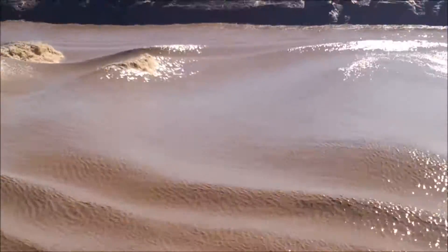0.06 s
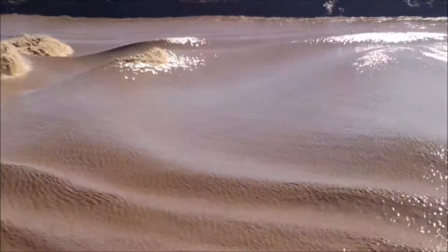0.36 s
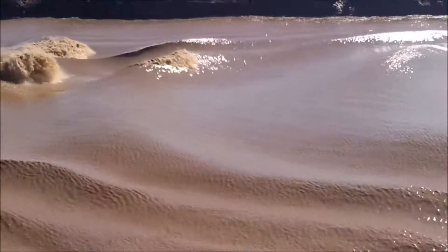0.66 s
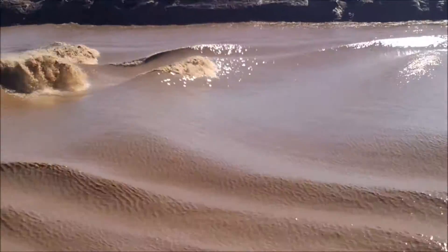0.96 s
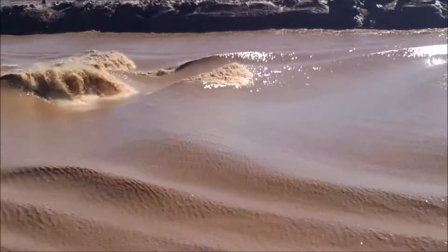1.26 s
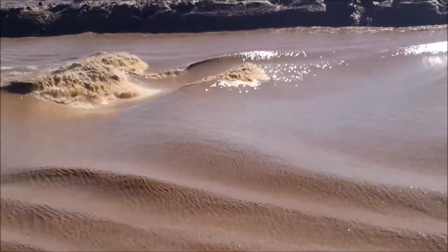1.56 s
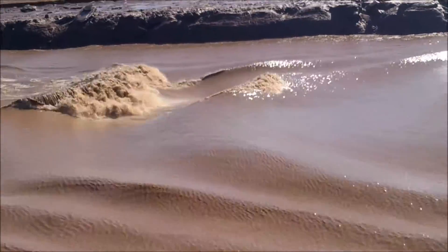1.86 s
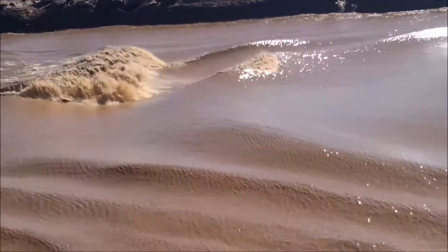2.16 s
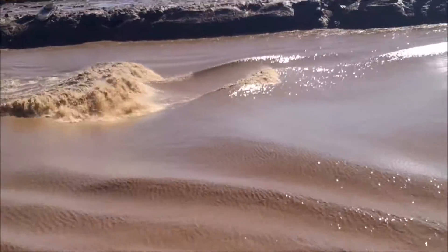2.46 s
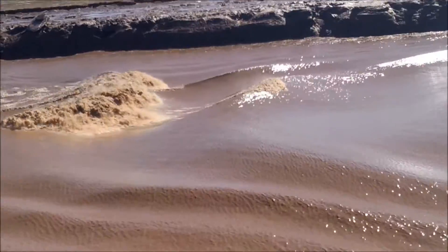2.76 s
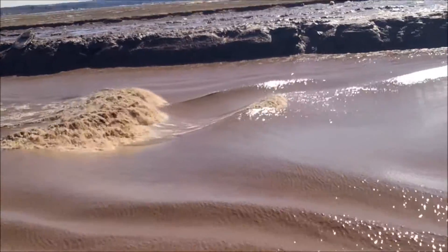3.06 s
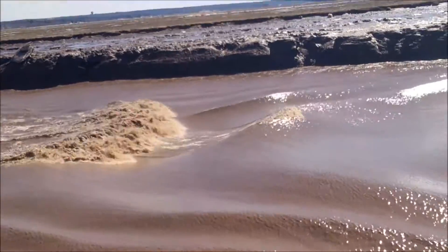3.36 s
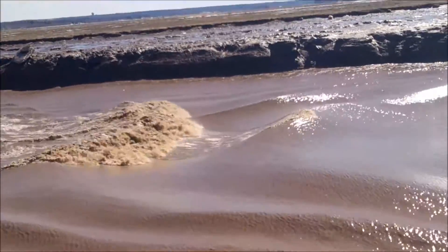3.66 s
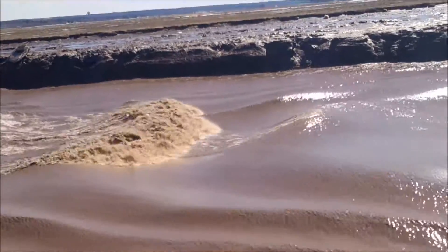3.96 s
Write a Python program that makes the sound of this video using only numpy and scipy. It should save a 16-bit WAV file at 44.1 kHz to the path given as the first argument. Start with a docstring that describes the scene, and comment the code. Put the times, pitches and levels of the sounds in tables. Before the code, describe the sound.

Rushing river water fades in over the first 0.7 seconds as a wave breaks some way off. Its bubbling roar swells until about 2 seconds, then holds to the end at 4 seconds. From about 1 second, spray and foam hiss above it. Close wind rumbles on the microphone throughout, with short fluttering gusts, strongest around 1.1, 2 to 2.4 and 3.2 seconds.

```python
"""A tidal bore runs up a muddy river, its breaking front some way off; the sound fades in.
The tumbling wave traps air, and clouds of bubbles roar as each rings at its own resonance.
Above the roar, spray, a small whitecap and bursting foam hiss with countless tiny impacts.
Close by, the turbulent pressure of the wind rumbles and flutters on the microphone."""
import sys
import numpy as np
from scipy import signal
from scipy.fft import rfft, irfft
from scipy.io import wavfile
from scipy.ndimage import uniform_filter1d

SR = 44100
rng = np.random.default_rng(int(sys.argv[2]) if len(sys.argv) > 2 else 0)


def dump(signal):
    """Clip the signal to [-1, 1] and save it as 16-bit WAV at the path in sys.argv[1]."""
    limited = np.clip(np.atleast_2d(signal).T, -1, 1)
    pcm = np.round(limited * 32767).astype(np.int16)
    wavfile.write(sys.argv[1], SR, pcm)


N = 176400
TIME_S = np.arange(N) / SR
BIN_HZ = np.maximum(np.arange(N // 2 + 1) * SR / N, 1)


def undb(db):
    """Amplitude grows tenfold for every 20 dB."""
    return 10 ** (np.asarray(db) / 20)


def unit(x):
    """Normalisation to rms 1."""
    return x / np.sqrt(np.mean(x ** 2))


def curve(rows, column=1):
    """Linear interpolation of one column of a table over time."""
    rows = np.array(rows)
    return np.interp(TIME_S, rows[:, 0], rows[:, column])


def colour(x, spectrum):
    """Spectral shaping at rms 1, falling 6 dB an octave beyond the table's ends."""
    hz, db = np.array(spectrum).T
    gain = undb(np.interp(np.log(BIN_HZ), np.log(hz), db))
    skirts = np.minimum(BIN_HZ / hz[0], 1) * np.minimum(hz[-1] / BIN_HZ, 1)
    return unit(irfft(rfft(x) * gain * skirts, N))


def resonance(x, hz, width_hz):
    """A damped resonator passes a band, with gain 1 at its centre."""
    return signal.lfilter(*signal.iirpeak(hz, hz / width_hz, fs=SR), x)


def noise():
    """Independent samples give a white spectrum."""
    return rng.standard_normal(N)


def wander(per_s):
    """Smooth random modulation at rms 1."""
    steps = rng.standard_normal(N // 10)
    line = np.interp(TIME_S * per_s, np.arange(len(steps)), steps)
    return unit(uniform_filter1d(line, int(SR / per_s / 2)))


def blend(grains, power_share):
    """Incoherent sources add in power: single grains over a wash of countless smaller ones."""
    return np.sqrt(power_share) * unit(grains) + np.sqrt(1 - power_share) * noise()


def bubbles(per_s=2600, low_hz=280, high_hz=3500, cycles=13, pitch_rise=0.14, spread_db=2):
    """Each bubble is a damped oscillator that rises in pitch as it dies."""
    out = np.zeros(N + SR)
    for when, pitch, size, sign in rng.random((int(per_s * N / SR), 4)):
        hz = low_hz * (high_hz / low_hz) ** pitch
        age = np.linspace(0, 1, int(cycles * SR / hz))
        phase = 2 * np.pi * cycles * age * (1 + pitch_rise * age / 2)
        ring = np.sin(phase) * np.exp(-np.log(100) * age)  # decays by 40 dB
        strength = hz * undb(-spread_db * np.log(max(size, .02)))
        start = int(when * N)
        out[start:start + len(age)] += ring * strength * np.sign(sign - .5)
    return out[:N]


# Spectrum of the bubble cloud: frequency_hz, relative_db
ROAR_SPECTRUM = [(120, -2), (250, -1.5), (350, -6.5), (470, 1.5), (600, -2), (780, -3), (1000, -10),
                 (1330, -7.5), (1750, -15), (2300, -19), (3200, -18.5), (6000, -47)]
# Strength of the breaking front and of its spray: time_s, roar_db, spray_db
BREAKER_LEVELS = [(0, -42, -47.5), (.5, -37.5, -49.5), (.65, -36.5, -44.5), (.92, -34, -45),
                  (1.02, -33, -35.5), (1.3, -32, -32.5), (1.7, -28, -31.5), (2.05, -26.5, -33),
                  (2.5, -28.5, -33), (2.9, -29, -31.5), (3.4, -29, -34), (3.7, -27, -32), (4, -27.5, -32.5)]


def roar(surge_db=0.23):
    """Air entrainment: the tumbling front folds in ringing bubbles in uneven surges."""
    surge = undb(curve(BREAKER_LEVELS) + surge_db * wander(22.1))
    return surge * colour(blend(bubbles(), power_share=0.39), ROAR_SPECTRUM)


def drops(per_s=7000, spread_db=0.5):
    """Shot noise: dense, tiny impacts of uneven size arrive at random."""
    impacts = rng.random(N) < per_s / SR
    size = undb(spread_db * np.minimum(rng.exponential(size=N), 5))
    return blend(impacts * size * np.sign(noise()), power_share=0.55)


# Spectrum of the falling droplets: frequency_hz, relative_db
SPRAY_SPECTRUM = [(800, 3.5), (2000, -2.5), (2900, -2.5), (4200, -3.5), (5300, -0.5), (6800, -1),
                  (8000, -3), (9800, -3.5), (11000, -9), (13000, -19), (15500, -22)]


def spray():
    """Brief impacts radiate a broad band: droplets fall back from the crest."""
    return colour(drops(), SPRAY_SPECTRUM) * undb(curve(BREAKER_LEVELS, column=2))


# Spectrum of the small crest: frequency_hz, relative_db
WHITECAP_SPECTRUM = [(300, 0.5), (600, 0.5), (850, 1.5), (1050, -8), (1400, -7), (1750, -16), (2200, -11.5),
                     (2600, -11), (3100, -14.5), (3700, -13), (4800, -9.5), (6500, -19.5), (8000, -15),
                     (9800, -17), (11000, -22), (15500, -40)]
# Strength of its spilling: time_s, level_db
WHITECAP_LEVELS = [(0, -42), (.25, -52), (.31, -37), (.39, -34.5), (.5, -37), (.9, -38), (1.5, -36),
                   (4, -43.5)]


def whitecap():
    """Impacts merge into a hiss as a small crest spills ahead of the main front."""
    return colour(drops(), WHITECAP_SPECTRUM) * undb(curve(WHITECAP_LEVELS))


def churn(water, bands=24, depth_db=0.85, per_s=4.04):
    """Independent amplitude modulation of each band makes the water's colour wander."""
    position = np.interp(np.log(BIN_HZ), np.log([500, 12000]), [0, bands - 1])
    spectrum = rfft(water)
    out = np.zeros(N)
    for k in range(bands):
        band = irfft(spectrum * np.maximum(1 - abs(position - k), 0), N)
        out += band * undb(depth_db * wander(per_s))
    return out


def eddies(spectrum, window_s):
    """Turbulent pressure: shaped noise, held even in strength by its running rms."""
    pressure = colour(noise(), spectrum)
    return pressure / np.sqrt(uniform_filter1d(pressure ** 2, int(window_s * SR)) + 1e-9)


# Spectrum of the light wind: frequency_hz, relative_db
BREEZE_SPECTRUM = [(10, -8), (25, 0.5), (45, -1), (90, -0.5), (150, -4), (240, -7.5), (350, -20.5),
                   (700, -32.5), (2000, -42)]


def breeze(level_db=-23.5, waver_db=1.15):
    """Continuous turbulence at the microphone makes a low, wavering rumble."""
    return eddies(BREEZE_SPECTRUM, window_s=.12) * undb(level_db + waver_db * wander(11))


# Spectra of the large and of the small eddies: frequency_hz, relative_db
RUMBLE_SPECTRUM = [(10, -14), (22, -0.5), (35, 1), (55, -1.5), (75, -0.5), (110, -12.5), (180, -20),
                   (350, -32), (1000, -53)]
FLUTTER_SPECTRUM = [(30, -3), (90, -2), (150, -0.5), (240, -1.5), (350, -9.5), (600, -18.5), (1200, -29.5),
                    (3000, -55)]
# Bell-shaped gusts on the microphone: peak_s, half_width_s, rumble_db, flutter_db
GUST_SWELLS = [(0.409, .015, -17, -21.5), (0.576, 0.039, -20, -34), (0.691, 0.01, -27, -18.5),
               (0.809, 0.011, -24, -17), (0.946, 0.024, -16, -27), (1.058, 0.011, -15.5, -38),
               (1.142, 0.023, -12.5, -24.5), (1.227, 0.024, -19, -31), (1.76, 0.023, -20.5, -28),
               (1.87, 0.028, -20.5, -28), (1.971, 0.027, -13.5, -40), (2.052, .018, -12.5, -22),
               (2.115, 0.021, -17, -19.5), (2.189, .035, -17, -28.5), (2.351, 0.026, -12.5, -27),
               (2.496, 0.046, -19.5, -31.5), (2.663, 0.017, -13, -36), (2.766, 0.024, -23, -28.5),
               (3.08, 0.028, -17.5, -34), (3.165, .013, -9.5, -30), (3.19, .016, -13, -16.5),
               (3.291, 0.024, -13.5, -18), (3.345, .012, -11, -19.5), (3.415, 0.026, -23.5, -24),
               (3.567, 0.013, -19, -28)]


def gusts():
    """Eddy size sets frequency: in each gust large eddies rumble and small ones flutter."""
    rumble_power = flutter_power = 0
    for peak_s, half_width_s, rumble_db, flutter_db in GUST_SWELLS:
        swell = np.exp(-((TIME_S - peak_s) / half_width_s) ** 2 / 2)
        rumble_power += (undb(rumble_db) * swell) ** 2
        flutter_power += (undb(flutter_db) * swell) ** 2
    rumble = np.sqrt(rumble_power) * eddies(RUMBLE_SPECTRUM, window_s=0.047)
    flutter = np.sqrt(flutter_power) * eddies(FLUTTER_SPECTRUM, window_s=0.033)
    return rumble + flutter


# Strength of the fresh foam: time_s, level_db
FOAM_LEVELS = [(0, -62), (1.1, -44), (1.3, -39.5), (1.7, -39), (2.05, -40), (2.3, -48), (2.9, -40),
               (3.4, -58), (4, -52)]


def foam(centre_hz=5660, width_hz=1100):
    """Impulses excite a resonance: bursting foam fizzes in one treble band."""
    fizz = resonance(drops(), centre_hz, width_hz)
    fizz = resonance(fizz, centre_hz, width_hz * 2)
    return unit(fizz) * undb(curve(FOAM_LEVELS))


def scene(buffet_db=1.3, surge_db=0.33, flicker_db=0.65, dip_db=-10, dip_s=0.422, dip_half_s=0.01):
    """Superposition of the wind close by and the waves beyond; the hiss dips briefly once."""
    wind = (breeze() + gusts()) * undb(buffet_db * wander(90))
    front = roar()
    hiss = undb(-2.0) * spray() + undb(-1.0) * foam()
    hiss *= undb(surge_db * wander(14) + flicker_db * wander(70))
    dip = undb(dip_db * np.exp(-((TIME_S - dip_s) / dip_half_s) ** 2 / 2))
    water = churn(front + dip * (hiss + whitecap()))
    return (wind + water)[None]


def record(dry, ring_db=9, fade_s=0.72, cutoff_hz=15700):
    """Microphone resonance lifts the high treble; the sound fades in and is low-pass filtered."""
    ring = undb(ring_db) * resonance(dry, hz=9170, width_hz=690)
    fade = np.minimum(TIME_S / fade_s, 1) ** 1.82
    low_pass = signal.firwin(1001, cutoff_hz, fs=SR)[None]
    return signal.fftconvolve((dry + ring) * fade, low_pass, mode="same")


dry = scene()
out = record(dry)
dump(out)
```